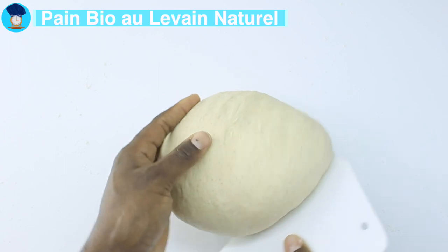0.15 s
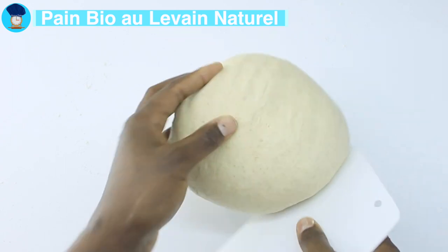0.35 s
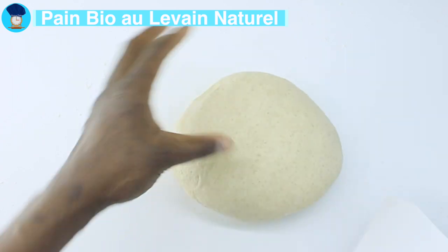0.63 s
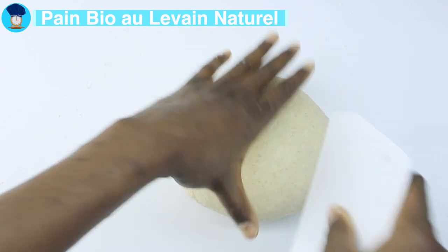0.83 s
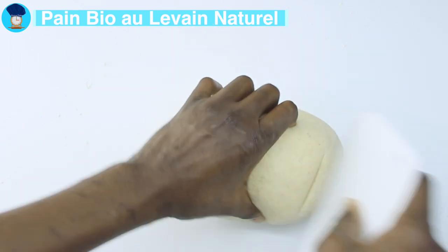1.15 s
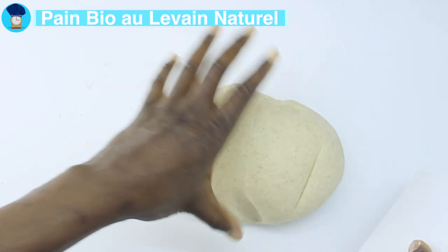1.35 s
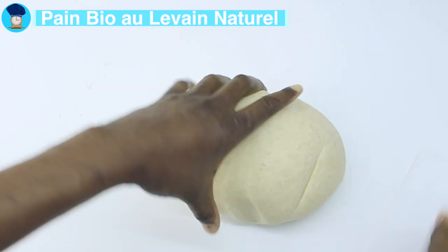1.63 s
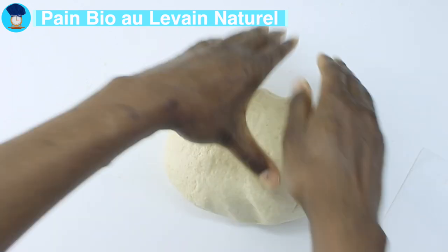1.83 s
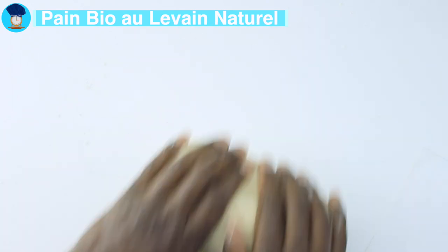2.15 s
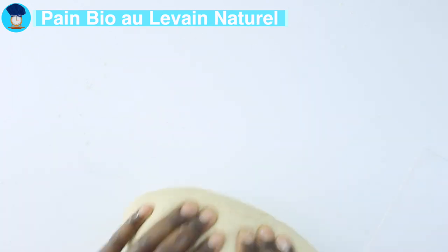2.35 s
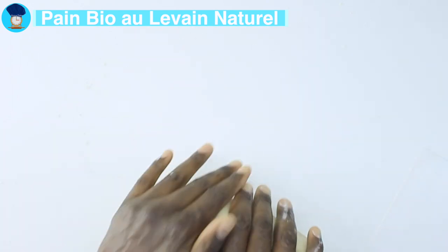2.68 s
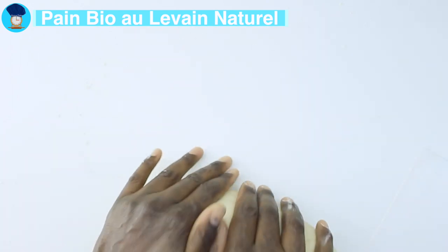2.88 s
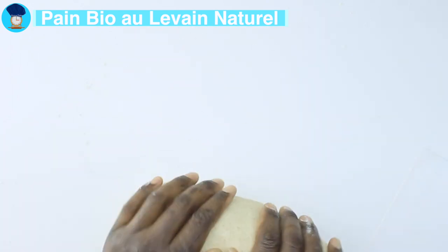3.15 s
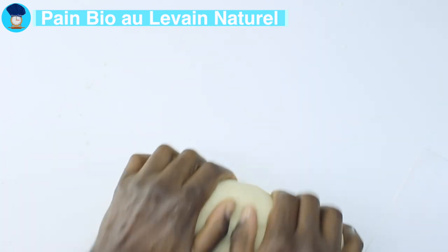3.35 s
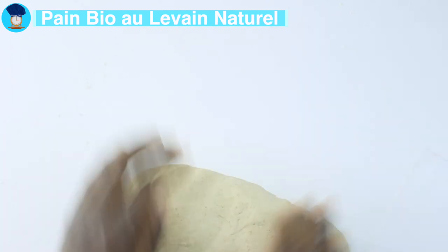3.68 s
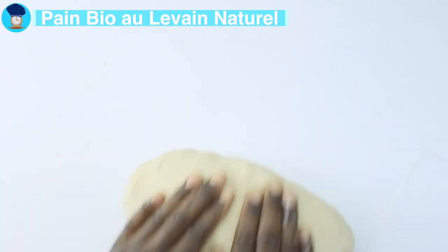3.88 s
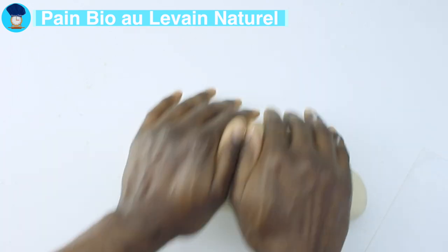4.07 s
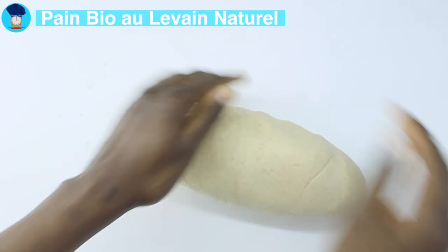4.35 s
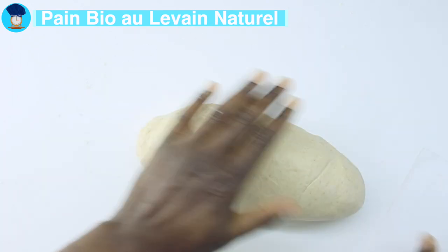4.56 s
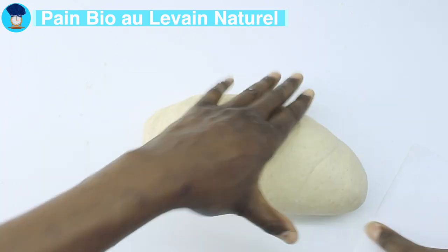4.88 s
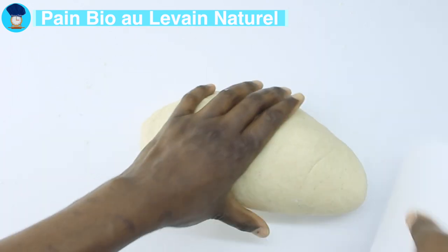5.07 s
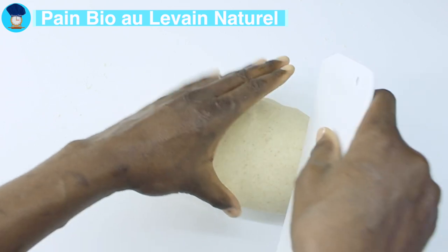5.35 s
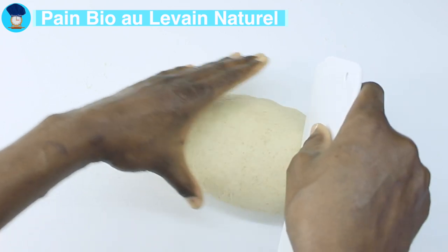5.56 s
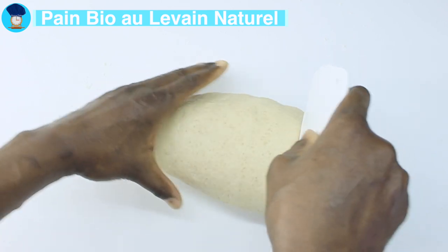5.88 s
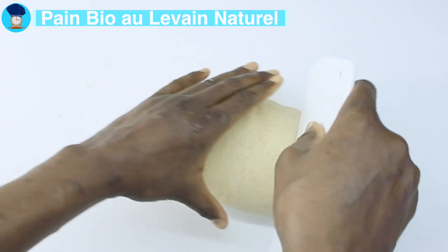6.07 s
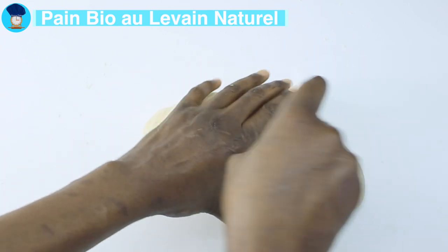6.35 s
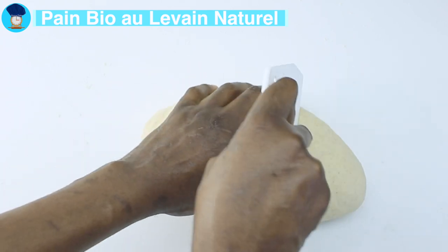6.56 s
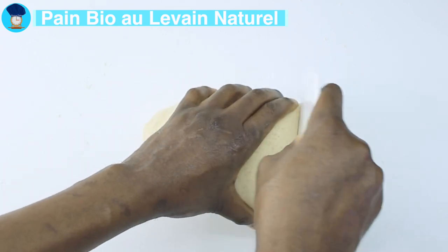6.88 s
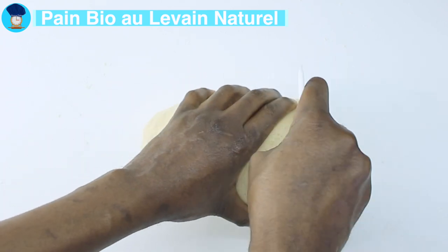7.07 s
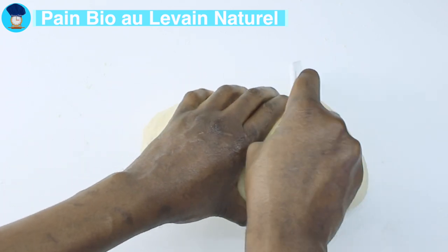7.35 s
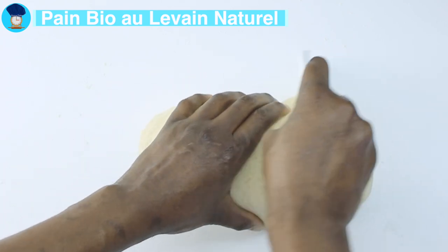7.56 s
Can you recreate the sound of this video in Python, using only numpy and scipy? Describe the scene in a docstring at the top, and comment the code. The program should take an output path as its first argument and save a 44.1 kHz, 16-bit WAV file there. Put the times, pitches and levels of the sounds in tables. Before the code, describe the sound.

Close stereo in a small kitchen with hard, short reflections. A plastic blade scrapes briefly at 0 s and fades while dough drags and bumps softly around 0.2-0.3 s. At 0.5 s the loaf lands with the loudest, deep woody thump and a fleshy slap. Quiet rubbing follows; at 1.55 s a soft pat and a tiny puff of air, then at 1.74 s a bright, hard plastic double clack as the scraper drops. From 2 to 4.7 s come muffled bumps, gentle pats, floury rubs, the clearest stroke near 2.2 s, and small air puffs at 2.7 s. At 5.0-5.1 s air puffs out and a second, softer thud lands with a small sharp knock. Afterwards it is almost still, with faint scraper touches and a soft bump and scrape at 7.5-7.7 s. Throughout, low air noise, motor hum and a faint high whine, squeaking in spells, notably around 4 s.

```python
"""Hands pat, fold and drag bread dough on a kitchen worktop: struck wood modes, and shaped noise for skin and slips.
A plastic scraper slides (slip noise) and drops (damped modes and a noisy crack); the loaf thuds down twice.
Trapped air puffs from under it: noise bursts through a resonant pocket. Hard walls answer close by.
Behind, air noise and a motor's hum; its bearing whines and, in spells, squeaks once a turn.
Place: a small hard-walled kitchen. Distance: close to the dough. Microphone: a stereo pair of close capsules."""
import sys
import numpy as np
from scipy import signal
from scipy.fft import rfft, irfft, next_fast_len
from scipy.io import wavfile
from scipy.ndimage import map_coordinates

SR = 44100
rng = np.random.default_rng(int(sys.argv[2]) if len(sys.argv) > 2 else 0)


def generate_wav(sig):
    """Save sig (samples, or channels by samples) to the path in sys.argv[1] as 16-bit PCM at SR."""
    pcm = np.round(np.clip(np.atleast_2d(sig).T, -1, 1) * 32767).astype(np.int16)
    wavfile.write(sys.argv[1], SR, pcm)


N = 340452
TIME = np.arange(N) / SR
AGE = np.arange(SR // 2) / SR  # time since a contact, s

# Hand or whole loaf landing: [t/s, worktop thud level/dB, palm smack level/dB, skin slap level/dB, closing time/s]
LANDINGS = [(0.5228, -13.5, -25.5, -29.5, 0.00052), (1.553, -39, -32.5, -42, 0.00048),
            (2.737, -36.5, -31.5, -46.5, 0.00027), (3.204, -33.5, -34.5, -41, 0.0039),
            (3.545, -37.5, -40, -42, 0.0072), (4.713, -35.5, -36.5, -34, 0.00076),
            (5.102, -22, -26.5, -28.5, 0.00084)]
# Loaf rocking and settling softly: [t/s, thud level/dB]
SOFT_BUMPS = [(0.237, -43), (0.301, -38), (0.972, -42), (1.312, -40.5), (2.0, -34.5), (4.096, -42),
              (4.335, -38.5), (7.526, -37.5)]
# Worktop resonances: [f/Hz, relative level/dB, t60/s]
WORKTOP_MODES = [(51.3, -17.5, 0.3), (86.2, -11.5, 0.16), (106.8, -7, 0.22), (143.4, 1.5, 0.099),
                 (179.5, -5, 0.1), (211.3, -6, 0.12), (253.5, -10.5, 0.12), (327.3, -1, .11),
                 (390, -15, 0.089)]
# Palm smack spectrum: [f/Hz, relative level/dB per Hz]
SMACK_SPECTRUM = [(150, -20.5), (400, -0.5), (750, -0.5), (1200, -1), (1900, -7.5), (2600, -16.5),
                  (6000, -42.5)]
# Skin slap spectrum: [f/Hz, relative level/dB per Hz]
SLAP_SPECTRUM = [(900, -40), (2100, -3), (3200, 0.5), (4500, -3), (6000, -8.5), (8000, -9), (10000, -14),
                 (13000, -23), (16000, -30)]
# Every soft bump: closing time, and skin sounds relative to its thud
BUMP_CLOSE_S, BUMP_SMACK_DB, BUMP_SLAP_DB = 0.0012, -12, -24.5


def pats():
    """Each landing shakes the worktop, smacks under the palm and slaps on the skin; soft bumps are mostly thud."""
    out = np.zeros((2, N))
    bumps = [(s, db, db + BUMP_SMACK_DB, db + BUMP_SLAP_DB, BUMP_CLOSE_S) for s, db in SOFT_BUMPS]
    for s, thud_db, smack_db, slap_db, swell in list(LANDINGS) + bumps:
        thud = ring(WORKTOP_MODES, swell, scatter_db=0.5)
        add(out, s, thud_db, kitchen(thud, wet_db=-8.0))
        # a slower contact also dies away more slowly
        smack = patches(SMACK_SPECTRUM, swell, fade=0.0019 + 1.1 * swell, wet_db=1.0, count=2)
        add(out, s, smack_db, smack)
        slap = patches(SLAP_SPECTRUM, swell, fade=0.0022 + 2.2 * swell, wet_db=-1.5, count=2)
        add(out, s, slap_db, slap)
    return out


# Strokes of the hands: [firmest t/s, length/s, dough drag level/dB]
HAND_STROKES = [(0.2, 0.55, -45.5), (1.15, 0.26, -52.5), (1.348, .1, -44.5), (1.718, 0.11, -47.5),
                (2.038, 0.11, -46), (2.209, 0.18, -39), (2.581, 0.071, -41.5), (3.081, 0.18, -44),
                (3.542, 0.19, -41), (4.12, 0.33, -47.5), (4.403, 0.16, -43), (5, 0.26, -46),
                (7.666, 0.21, -46)]
# Dough dragging on the worktop: [f/Hz, relative level/dB per Hz]
DRAG_SPECTRUM = [(55, -25), (95, -3), (140, 4), (230, -4.5), (335, 4), (450, -9), (900, -32.5)]
# Palm rubbing the dough: [f/Hz, relative level/dB per Hz]
RUB_SPECTRUM = [(200, -34), (480, -1.5), (1000, 0.5), (2200, -5), (3200, -7), (6000, -51)]
# Hiss of flour: [f/Hz, relative level/dB per Hz]
FLOUR_SPECTRUM = [(1300, -32), (2300, -4.5), (4000, 4.5), (5500, -4.5), (7500, -4.5), (10000, -12),
                  (13000, -23), (16000, -31)]
# Dry fingers brushing the skin of the loaf: [firmest t/s, length/s, level/dB]
FINGER_BRUSHES = [(1.314, .025, -49), (1.351, 0.035, -47.5), (2.18, 0.23, -53), (3.57, 0.057, -49.5)]
# Finger brush spectrum: [f/Hz, relative level/dB per Hz]
BRUSH_SPECTRUM = [(3500, -20), (5500, 4), (6800, 5.5), (9000, 2), (13000, -2), (16000, -18)]
# Palm rub and flour hiss relative to the drag, for a stroke of usual length
RUB_DB, FLOUR_DB, USUAL_STROKE_S = -4, -9.5, 0.15
QUICK_DB = 1.2  # rub and hiss gain this much per halving of the stroke's length


def strokes():
    """Dough sticks and slips on the worktop while floury palms rub and dry fingers brush over it."""
    each = pressure(HAND_STROKES)
    lengths = np.array(HAND_STROKES)[:, 1]
    quickness = np.log2(USUAL_STROKE_S / lengths)
    drag_gain = each.sum(0)
    skin_gain = amp(QUICK_DB * quickness) @ each
    brush_gain = pressure(FINGER_BRUSHES).sum(0)
    drag = friction(drag_gain, DRAG_SPECTRUM, slip_hz=88.7, rough_db=1.5, wet_db=-6.0)
    rub = friction(amp(RUB_DB) * skin_gain, RUB_SPECTRUM, slip_hz=217.5, rough_db=3.0, wet_db=-4.5)
    flour = friction(amp(FLOUR_DB) * skin_gain, FLOUR_SPECTRUM, slip_hz=303, rough_db=3.0, wet_db=-2.0)
    brush = friction(brush_gain, BRUSH_SPECTRUM, slip_hz=310, rough_db=4.0, wet_db=-2.5)
    return drag + rub + flour + brush


# Blade pushed over the worktop: [firmest t/s, length/s, level/dB]
BLADE_PUSHES = [(0.0, 0.081, -25), (0.07, 0.13, -35), (5.37, 0.21, -53.5), (6.44, .06, -60),
                (7.17, .06, -56.5), (7.70, 0.17, -46.5)]
# Scraping noise, also the hiss of the puffs: [f/Hz, relative level/dB per Hz]
SCRAPE_SPECTRUM = [(90, -2.5), (140, 1.5), (250, -4.5), (500, -8.5), (870, 2), (1300, 0), (1900, -4.5),
                   (2600, -5), (4500, -10), (8000, -18.5), (13000, -24.5), (16000, -45)]
# Scraper landing on its edge, then flat: [t/s, ring level/dB, crack level/dB]
BLADE_CLACKS = [(1.7392, -35, -17.5), (1.7439, -18, -15)]
# Plastic blade on the worktop, before the clack's extra damping: [f/Hz, relative level/dB, t60/s]
BLADE_MODES = [(392, 0, 0.21), (440, 5, 0.067), (638, -5, 0.3), (970, -20, 0.11), (1079, 5.5, 0.088),
               (1262, -10, 0.12), (1455, -15, .17), (1600, -5, 0.136), (1730, 7, 0.13), (1744, 7, 0.15),
               (1940, -15, 0.2), (2230, -10, 0.18), (2520, 5, 0.12), (3311, 2.5, 0.19), (3570, -1.5, 0.2),
               (4800, -13, .17)]
# Noise of the clack: [f/Hz, relative level/dB per Hz]
CRACK_SPECTRUM = [(70, -9), (200, -3.5), (300, -5.5), (410, 1), (560, -2.5), (1100, 0.5), (1800, 1.5),
                  (2600, -1.5), (4000, -2.5), (6000, -7.5), (8000, -7.5), (10000, -14), (13400, -15.5),
                  (16000, -46)]
# Blade's edge knocking on the worktop: [t/s, level/dB]
EDGE_KNOCKS = [(1.223, -67), (5.102, -31), (7.158, -60.5)]
# Blade held stiff in the hand: [f/Hz, relative level/dB, t60/s]
EDGE_MODES = [(2180, 5, 0.043), (2215, -3.5, 0.03), (4100, -3, 0.061), (4400, -8, 0.12), (4770, -8, 0.096),
              (5050, -12, 0.13), (8160, -11.5, 0.057)]


def scraper():
    """The blade slides out from under the dough, is dropped with a clack, and knocks on its edge as it is used."""
    push_gain = pressure(BLADE_PUSHES).sum(0)
    out = friction(push_gain, SCRAPE_SPECTRUM, slip_hz=505, rough_db=0.5, wet_db=-1.5)
    for s, ring_db, crack_db in BLADE_CLACKS:
        blade = ring(BLADE_MODES, swell=0.00053, scatter_db=2.1) * np.exp(-AGE / 0.058)
        add(out, s, ring_db, kitchen(blade, wet_db=-10))
        crack = patches(CRACK_SPECTRUM, swell=0.00034, fade=0.0044, wet_db=-1.4, count=4)
        add(out, s, crack_db, crack)
    for s, db in EDGE_KNOCKS:
        edge = ring(EDGE_MODES, swell=0.0003, scatter_db=1.5)
        add(out, s, db, kitchen(edge, wet_db=-4))
    return out


# Air squeezed from under the dough: [t/s, pocket level/dB, pocket f/Hz, swell/s]
AIR_PUFFS = [(1.609, -35.5, 985, 0.0026), (2.712, -46, 1520, 0.0053), (2.726, -39, 1640, 0.0056),
             (4.887, -46, 1260, 0.0034), (5.024, -28.5, 1100, 0.0069)]
POCKET_WIDTH, RIM_HISS_DB = 0.3, -4  # bandwidth over pitch; hiss relative to the pocket


def puffs():
    """Escaping air sounds the pocket between dough and palm, and hisses at its rim."""
    out = np.zeros((2, N))
    for s, db, pocket_hz, swell in AIR_PUFFS:
        width = POCKET_WIDTH * pocket_hz
        resonance = lambda f: 1j * f * width / (pocket_hz ** 2 - f * f + 1j * f * width)
        pocket = filtered(burst(swell, fade=2.0 * swell), lambda f: resonance(f) ** 2)
        add(out, s, db, kitchen(pocket, wet_db=-2.5))
        hiss = patches(SCRAPE_SPECTRUM, swell, fade=1.85 * swell, wet_db=7.5, count=1)
        add(out, s, db + RIM_HISS_DB, hiss)
    return out


# Room air noise: [f/Hz, relative level/dB per Hz]
AIR_SPECTRUM = [(25, -29), (65, -12.5), (95, -1), (130, -5.5), (190, -6.5), (330, -3), (470, -5.5),
                (620, -5.5), (950, -5), (1500, -14), (2700, -18.5), (4500, -20.5), (7500, -25),
                (15500, -34.5)]
# Air noise at the two capsules: [f/Hz, left-right likeness]
AIR_LIKENESS = [(100, 0.61), (300, 0.66), (800, 0.73), (2500, 0.034), (8000, 0.027)]
# Motor hum: [multiple of the turning rate, level/dB]
HUM_PARTIALS = [(1, -58.5), (2, -66.5), (3, -62), (6, -65), (12.5, -63), (15, -70.5)]
# Spells of bearing squeak: [middle t/s, level/dB]
SQUEAK_SPELLS = [(0.405, -65), (1.28, -66), (2.96, -62), (4.02, -57), (5.986, -64), (7.017, -65.5)]
# Bearing's rasp around its squeak: [f/Hz, relative level/dB per Hz]
RASP_SPECTRUM = [(2750, -40), (3010, -6), (3180, -5), (3500, -14), (4250, -14), (4590, -8), (4800, -39)]
# Bearing's steady whine: [f/Hz, relative level/dB per Hz]
WHINE_SPECTRUM = [(2700, -24.5), (3050, -8.5), (3250, -1.5), (3500, -18), (4250, -10), (4450, 0.5),
                  (4600, -2.5), (4800, -26.5)]
MOTOR_HZ = 49.16  # mean turns a second
SPELL_S = 0.16  # half length of a squeak spell
SQUEAK_IDLE_DB, WHINE_DB = -68.5, -68.5  # mean levels: squeak left between spells, and whine


def motor():
    """Steady air noise and hum; across the room the bearing whines, and squeaks once a turn in spells."""
    air = unit(filtered(diffuse(N, AIR_LIKENESS), lambda hz: amp(along(AIR_SPECTRUM, hz))))
    turns = np.cumsum(MOTOR_HZ * (1 + 0.0023 * wobble(3.01))) / SR
    hum = sum(amp(db) * np.sqrt(2) * np.sin(2 * np.pi * (k * turns + rng.random()))
              for k, db in HUM_PARTIALS)
    spells = sum(amp(db) * np.exp(-((TIME - s) / SPELL_S) ** 2) for s, db in SQUEAK_SPELLS)
    squeak_gain = spells + amp(SQUEAK_IDLE_DB + 1.0 * wobble(3.25))
    rubbing = (1 + np.cos(2 * np.pi * turns)) * amp(2.0 * wobble(30))  # every turn rubs a little differently
    tone = unit(np.sin(2 * np.pi * 3052 * TIME + 0.53 * wobble(60)))
    rasp = unit(coloured(rng.standard_normal(N), RASP_SPECTRUM))
    squeak = tone + amp(-2.0) * rasp
    bearing = squeak_gain * unit(kitchen(rubbing * squeak, wet_db=1))
    whine_gain = amp(WHINE_DB + 1.5 * wobble(2.93))
    whine = whine_gain * unit(kitchen(coloured(rng.standard_normal(N), WHINE_SPECTRUM), wet_db=1))
    return amp(-51.0) * air + hum + bearing + whine


# Decay of the small kitchen: [f/Hz, t60/s]
KITCHEN_DECAY = [(100, 0.45), (300, 0.27), (800, 0.3), (2000, 0.23), (5000, 0.25), (13000, 0.18)]
# Wall reflections at the two capsules: [f/Hz, left-right likeness]
ROOM_LIKENESS = [(100, 1), (250, 0.98), (800, 0.94), (2500, 0.79), (6000, 0.34), (11000, 0.056)]


def kitchen(x, wet_db):
    """A mono sound plus the answer of the walls in stereo, wet_db relative to the direct sound."""
    hz, t, z = signal.stft(diffuse(len(AGE), ROOM_LIKENESS), SR, nperseg=256)
    decay = amp(-60 * t / along(KITCHEN_DECAY, hz)[:, None])
    tail = signal.istft(z * decay, SR, nperseg=256)[1][:, :len(AGE)]
    tail = tail * (1 - np.exp(-(AGE / 0.0019) ** 2))  # the first echoes take a few ms
    response = amp(wet_db) * tail / np.linalg.norm(tail[0])
    response[:, 0] += 1  # direct sound
    return signal.fftconvolve(x[None], response, axes=1)[:, :len(x)]


def diffuse(n, alike):
    """White stereo noise as it reaches two close capsules from all sides."""
    turn = lambda hz: np.arccos(np.clip(along(alike, hz), -1, 1)) / 2
    mid_side = lambda hz: np.array([np.cos(turn(hz)), np.sin(turn(hz))])
    mid, side = filtered(rng.standard_normal((2, n)), mid_side)
    return np.array([mid + side, mid - side])


def burst(swell, fade):
    """Noise of a contact that closes and dies away."""
    return rng.standard_normal(len(AGE)) * (1 - np.exp(-(AGE / swell) ** 2)) * np.exp(-AGE / fade)


def patches(spectrum, swell, fade, wet_db, count):
    """Several spots of a surface close together, each with its own path through the room."""
    return sum(kitchen(coloured(burst(swell, fade), spectrum), wet_db) for _ in range(count))


def ring(modes, swell, scatter_db):
    """Damped modes, struck at new strengths each time."""
    hz, db, t60 = np.transpose(modes)[:, :, None]
    strength = amp(db + scatter_db * rng.standard_normal(hz.shape)) * rng.choice([-1, 1], hz.shape)
    partials = strength * amp(-60 * AGE / t60) * np.sin(2 * np.pi * hz * AGE)
    return np.sum(partials, 0) * (1 - np.exp(-AGE / swell))


def friction(gain, spectrum, slip_hz, rough_db, wet_db):
    """Tiny slips in uneven clumps, following the pressure of the stroke."""
    clumps = rng.standard_normal(N) * amp(rough_db * wobble(slip_hz))
    slips = unit(coloured(clumps, spectrum))
    return kitchen(slips * gain, wet_db) / np.sqrt(1 + amp(wet_db) ** 2)  # level includes the walls


BUILD_UP = 0.63  # share of a stroke spent bearing down; the rest lets go
FULLNESS = 0.54  # exponent of the rise and fall: below 1 the pressure comes quickly and holds


def pressure(rows):
    """One line of gain per stroke: the hand bears down, then lets go."""
    lines = []
    for s, length, db in rows:
        corners = [s - BUILD_UP * length, s, s + (1 - BUILD_UP) * length]
        lines.append(amp(db) * np.interp(TIME, corners, [0, 1, 0]) ** FULLNESS)
    return np.array(lines)


def add(track, s, db, sound):
    """Lay a blow into the track, db being the level of its first 25 ms."""
    start = max(round(s * SR), 0)
    part = sound[:, :N - start] * amp(db) / np.sqrt(np.mean(sound[:, :SR // 40] ** 2))
    track[:, start:start + part.shape[1]] += part


def amp(db):
    """Gain of a level in dB."""
    return 10 ** (np.asarray(db) / 20)


def unit(x):
    """Scaled to rms 1."""
    return x / np.sqrt(np.mean(x ** 2) + 1e-20)


def along(points, hz):
    """Values between (f/Hz, value) points on a log frequency axis."""
    f, v = np.transpose(points)
    return np.interp(np.log(hz + 1), np.log(f + 1), v)


def wobble(rate):
    """A smooth random curve, rate knots a second."""
    return map_coordinates(rng.standard_normal(int(N * rate / SR) + 4), [TIME * rate], order=2)


def filtered(x, response):
    """x times a response of frequency."""
    n = x.shape[-1]
    m = next_fast_len(n + 8192)
    return irfft(rfft(x, m) * response(np.fft.rfftfreq(m, 1 / SR)), m)[..., :n]


def coloured(x, spectrum):
    """x through a causal (minimum-phase) filter with the given spectrum."""
    size = 2048
    cepstrum = irfft(np.log(amp(along(spectrum, np.fft.rfftfreq(size, 1 / SR)))))
    cepstrum[1:size // 2] *= 2  # fold the cepstrum onto positive time
    cepstrum[size // 2 + 1:] = 0
    return signal.fftconvolve(x, irfft(np.exp(rfft(cepstrum))))[:len(x)]


def scene():
    """Everything heard at the worktop, from the dough to the motor behind."""
    return pats() + scraper() + puffs() + strokes() + motor()


# Level difference of the capsules: [f/Hz, left minus right level/dB]
CAPSULE_LEAN = [(50, -4.5), (200, -2.5), (800, -1.8), (2500, -0.5), (6000, -.5), (11000, -0.4)]
# Phase difference of the capsules: [f/Hz, lead of the left/rad]
CAPSULE_LEAD = [(100, 0.4), (600, 0.09), (3000, 0.77), (6000, -0.04), (10000, -1.15), (15000, -2.2)]
TOP_HZ = 15800  # upper end of the band


def record(dry):
    """The capsules shed deep bass and differ in level and phase; peaks stop at full scale and the band ends sharply."""
    low_cut = signal.butter(4, 36, "highpass", fs=SR, output="sos")
    halves = [0.5, -0.5]  # each difference is shared between left and right

    def capsules(hz):
        """Level and phase of the left and right capsule."""
        level = amp(np.outer(halves, along(CAPSULE_LEAN, hz)))
        return level * np.exp(1j * np.outer(halves, along(CAPSULE_LEAD, hz)))

    heard = filtered(signal.sosfilt(low_cut, dry), capsules)
    return filtered(np.clip(heard, -1, 1), lambda hz: hz < TOP_HZ)


dry = scene()
out = record(dry)
generate_wav(out)
```